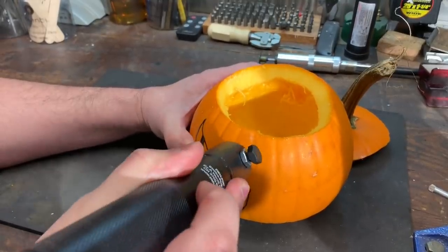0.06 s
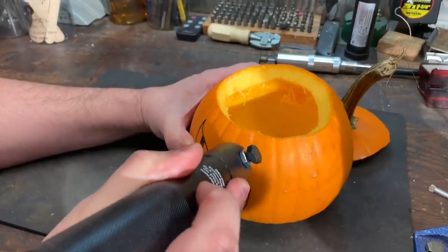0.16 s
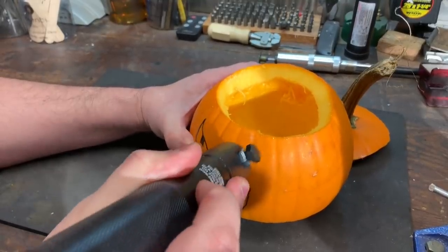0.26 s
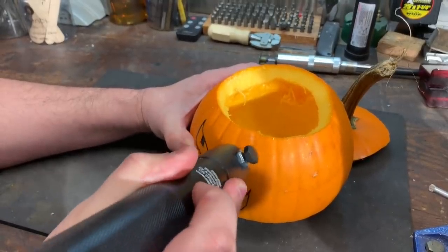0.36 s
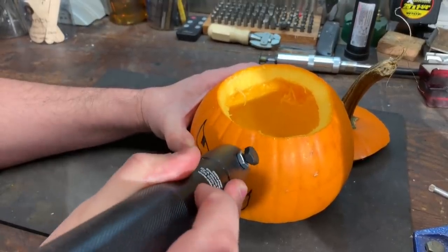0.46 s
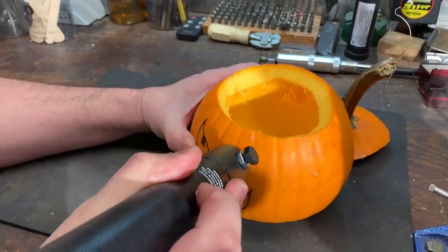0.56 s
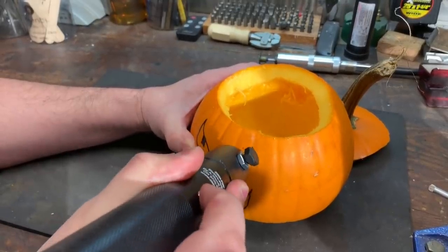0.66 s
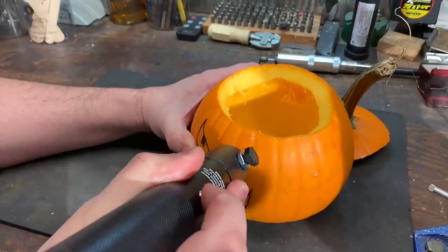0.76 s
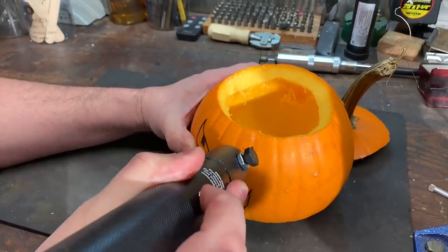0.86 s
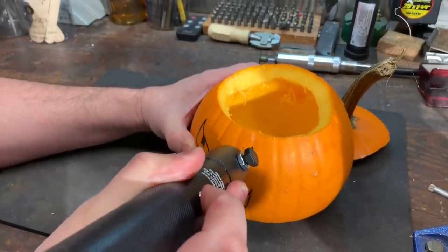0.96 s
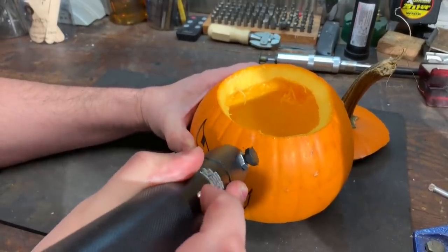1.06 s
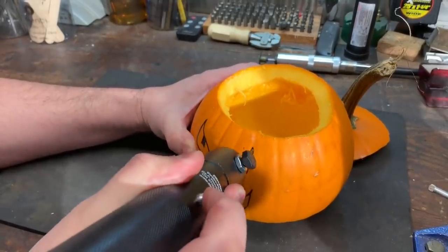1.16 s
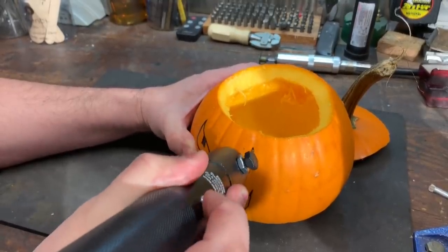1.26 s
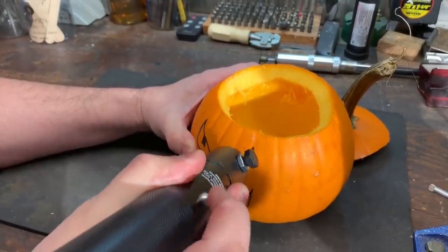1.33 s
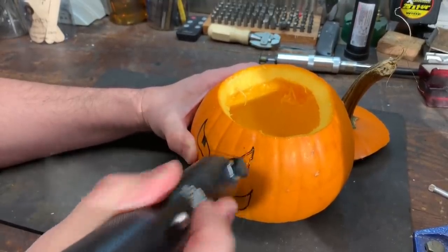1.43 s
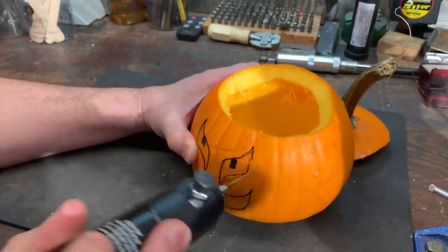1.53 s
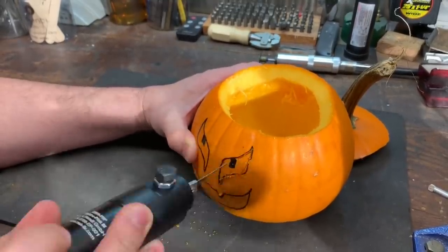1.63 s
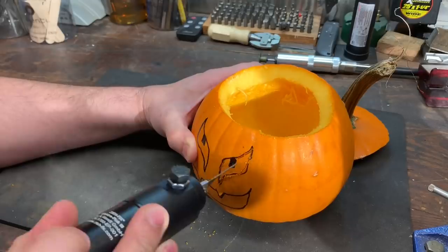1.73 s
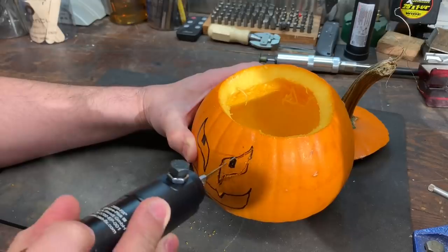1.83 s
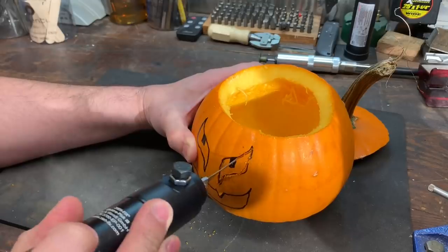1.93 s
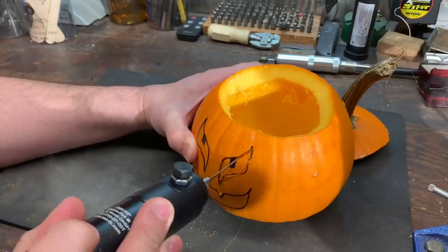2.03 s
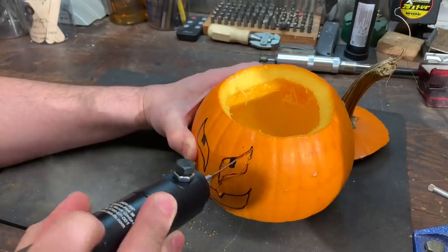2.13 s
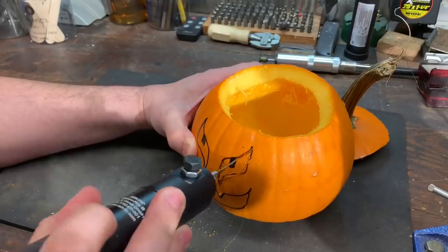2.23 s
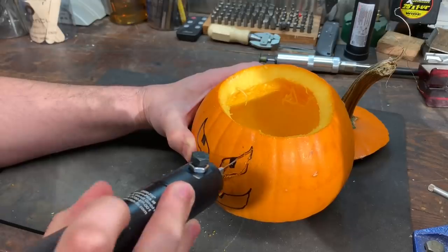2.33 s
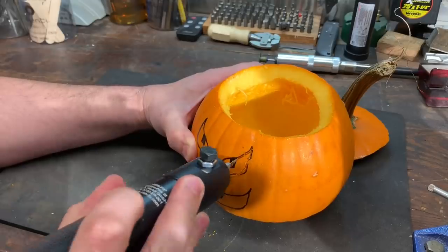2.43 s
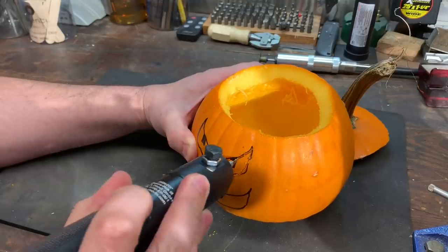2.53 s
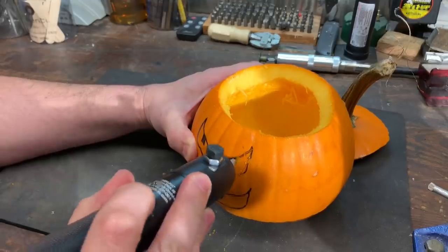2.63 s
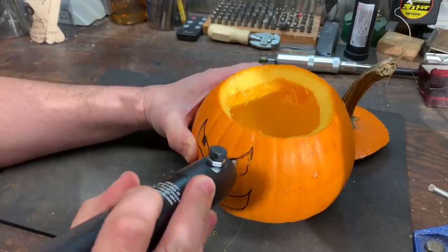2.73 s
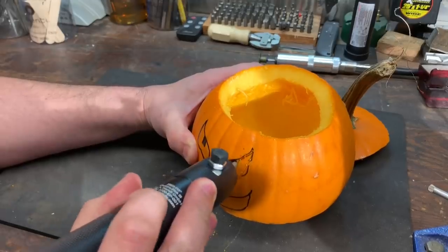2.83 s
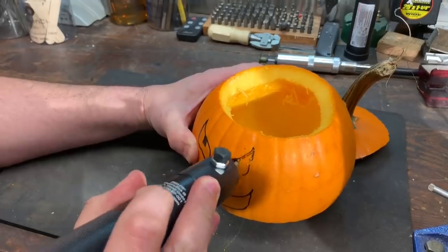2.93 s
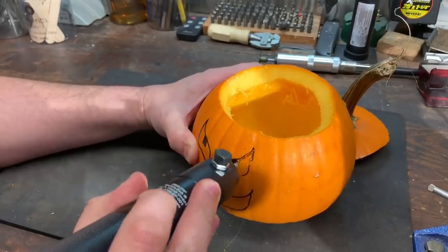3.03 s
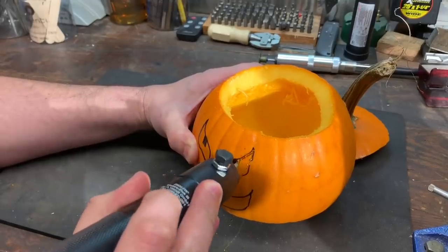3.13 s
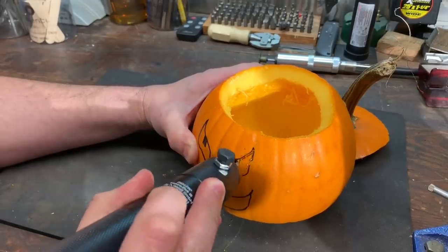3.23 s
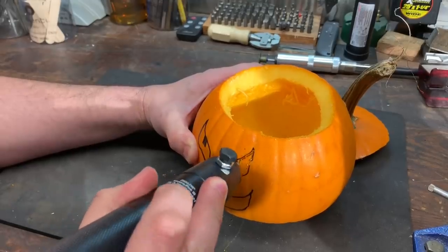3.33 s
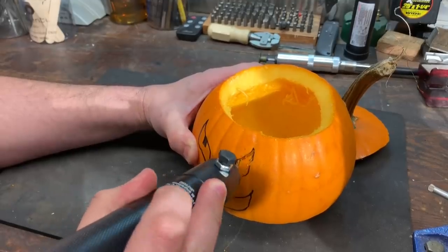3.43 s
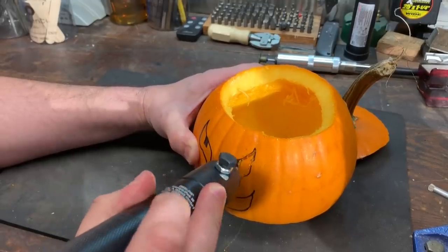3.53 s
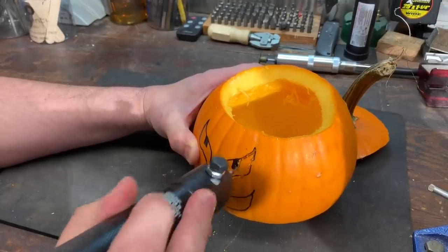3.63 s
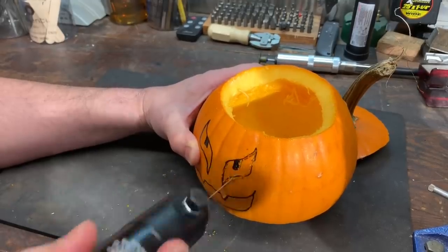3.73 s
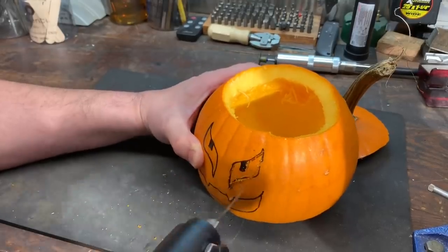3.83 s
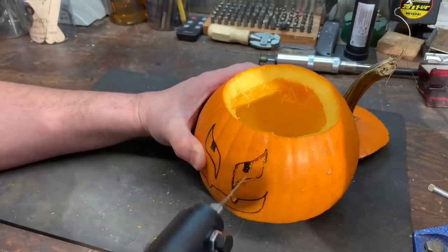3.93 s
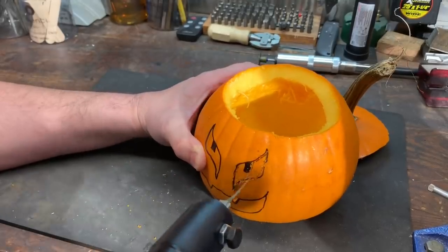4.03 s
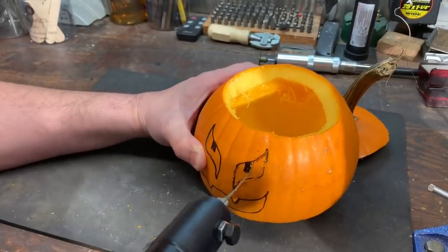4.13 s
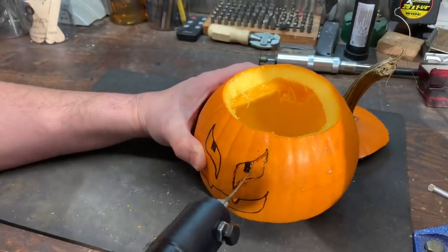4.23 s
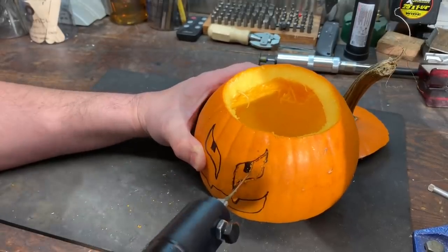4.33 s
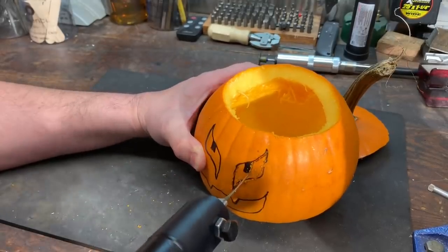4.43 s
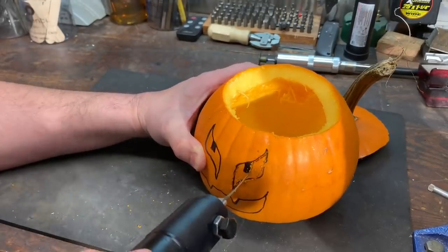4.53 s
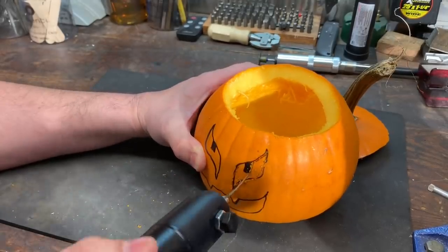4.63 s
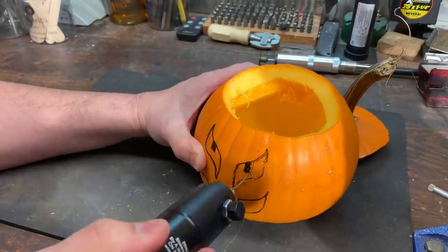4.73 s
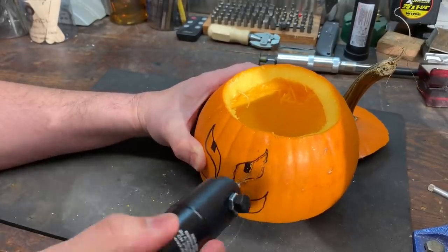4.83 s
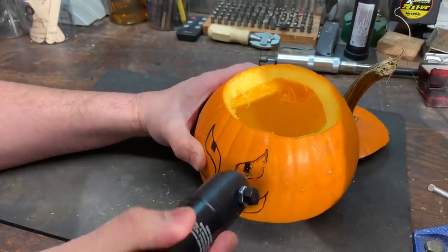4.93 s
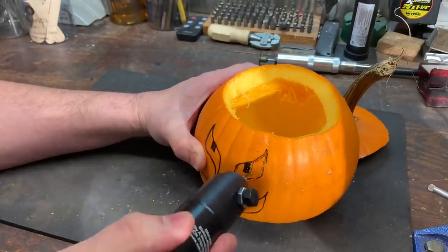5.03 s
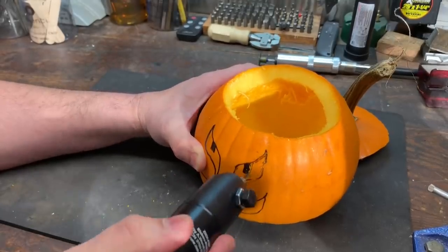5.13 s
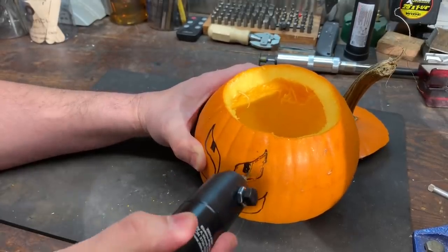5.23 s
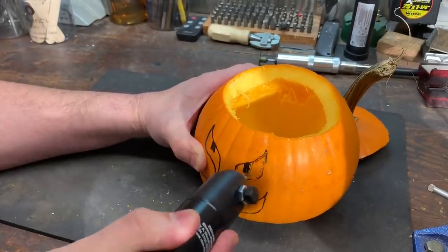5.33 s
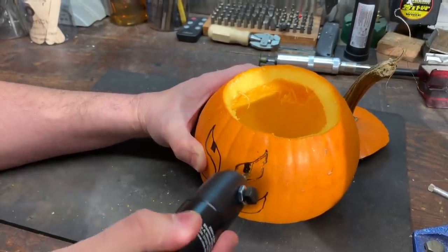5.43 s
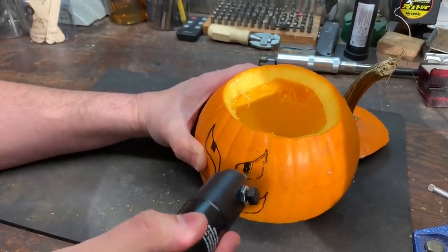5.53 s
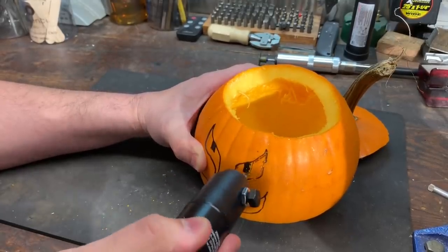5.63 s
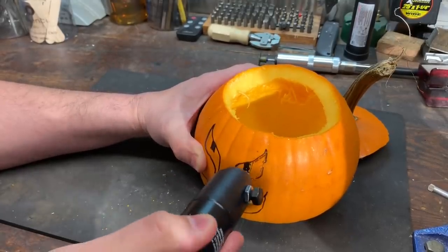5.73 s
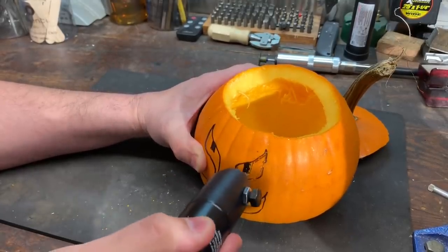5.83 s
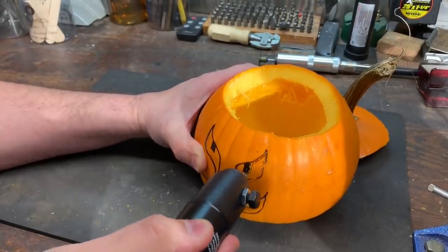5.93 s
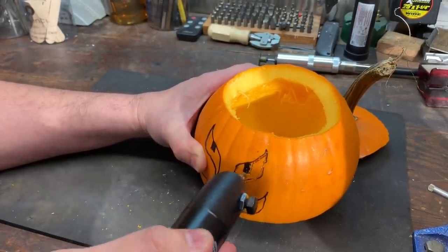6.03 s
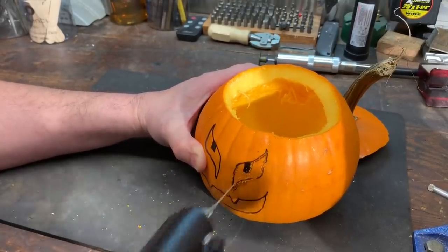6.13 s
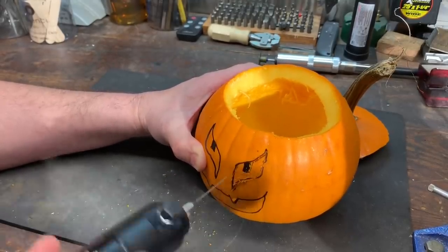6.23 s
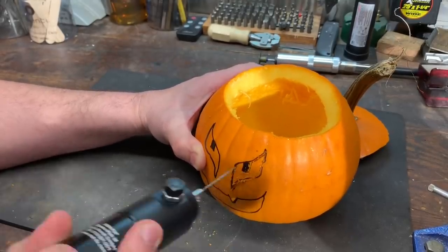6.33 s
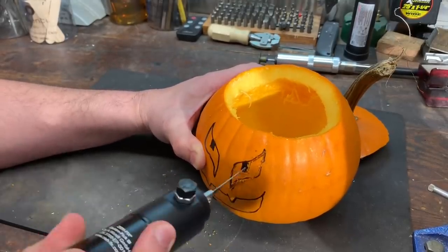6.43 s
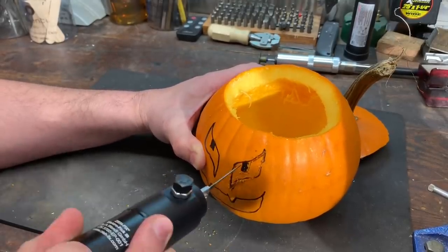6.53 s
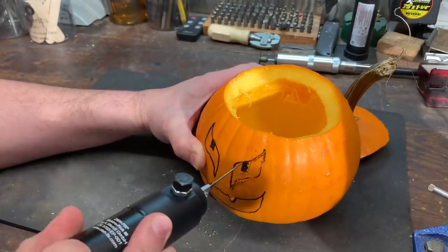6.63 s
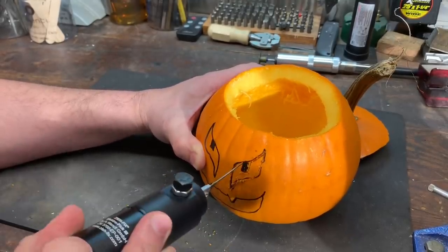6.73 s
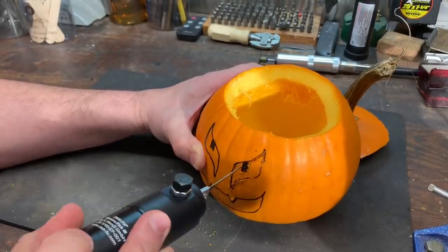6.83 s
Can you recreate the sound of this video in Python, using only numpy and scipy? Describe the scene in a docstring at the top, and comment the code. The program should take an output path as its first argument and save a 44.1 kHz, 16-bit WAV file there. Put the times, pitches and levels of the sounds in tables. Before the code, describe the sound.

Close, raspy motor-driven hammering on a hollow pumpkin comes in four bursts, its pitch wavering, with faint rustles and ticks in the quiet gaps.

```python
"""An electric pick gun buzzes in four bursts against a pumpkin: each blow of its striker excites resonances.
Loose bouncing gives a ragged rattle; when the needle bites into the flesh the striker locks into a
steadier beat, mostly 340-410 blows a second, which adds a harmonic series.
Behind it in a quiet workshop: air noise, mains buzz as harmonics of 120 Hz and a wavering low tone;
fingers slide as clumped grains, ticks are dying noise puffs, crickets trill as narrow-band noise."""
import sys
import numpy as np
from scipy import signal
from scipy.fft import rfft, irfft
from scipy.io import wavfile
from scipy.ndimage import uniform_filter1d

SR = 44100
rng = np.random.default_rng(int(sys.argv[2]) if len(sys.argv) > 2 else 0)


def generate_wav(signal):
    """Clip the signal to [-1, 1] and save it as 16-bit WAV at the path in sys.argv[1]."""
    frames = np.transpose(np.atleast_2d(signal))
    scaled = np.clip(frames, -1, 1) * 32767
    pcm = np.round(scaled).astype(np.int16)
    wavfile.write(sys.argv[1], SR, pcm)


N = 302967
T = np.arange(N) / SR


def amp(db):
    """Decibel law: the amplitude ratio of a level in dB."""
    return 10 ** (np.asarray(db) / 20)


def rms_one(x):
    """Power normalization: the signal scaled to unit mean square."""
    return x / np.sqrt(np.mean(x ** 2) + 1e-20)


def in_time(rows):
    """Linear interpolation: each column after the first as a curve over all samples."""
    s, *columns = np.transpose(rows)
    return [np.interp(T, s, column) for column in columns]


def faded(start, end, in_s, out_s):
    """Linear envelope: 1 between start and end, with straight ramps inside."""
    return np.clip(np.minimum((T - start) / in_s, (end - T) / out_s), 0, 1)


def drift(hz):
    """Low-passed random process: two equal poles at hz leave slow chance of unit rms."""
    r = np.exp(-2 * np.pi * hz / SR)
    noise = rng.standard_normal(N + SR)
    settled = signal.lfilter([1], [1, -2 * r, r * r], noise)[SR:]
    return rms_one(settled)


def resonate(x, hz, width_hz):
    """Damped resonator: a pole pair whose bandwidth sets its decay, with gain near 1 at the peak."""
    r = np.exp(-np.pi * width_hz / SR)
    zeros = np.array([1, 0, -1]) * (1 - r * r) / 2
    poles = [1, -2 * r * np.cos(2 * np.pi * hz / SR), r * r]
    return signal.lfilter(zeros, poles, x + 1e-18)


def body(x, modes, damping=1):
    """Modal superposition: parallel resonators of alternating sign; damping widens each one."""
    return sum((-1) ** k * amp(db) * resonate(x, hz, width * damping)
               for k, (hz, width, db) in enumerate(modes))


def evened(x, window_s):
    """Level equalization: division by the smoothed rms removes slow level changes."""
    size = int(window_s * SR)
    power = uniform_filter1d(uniform_filter1d(x * x, size), size)
    return x / np.sqrt(power + 1e-14)


def echoes(x, t60, first_s):
    """Diffuse reverberation: convolution with exponentially decaying noise of unit energy."""
    t = T[:SR // 2]
    pattern = rng.standard_normal(len(t)) * amp(-60 * t / t60) * (t > first_s)
    return signal.fftconvolve(x, pattern / np.sqrt(np.sum(pattern ** 2)))[:N]


# The needle bites: locked_from_s, locked_to_s, locking_s, slipping_s, looseness_left (0-1),
# then level shifts housing_and_cap_db, needle_db, collet_db, tip_db
BITES = [(0.514, 0.609, 0.029, 0.052, .45, -0.5, -3.5, 1, 0),
         (.65, 0.896, 0.042, 0.037, 0.02, -0.5, 3, 11.5, 5),
         (2.62, 2.673, 0.038, 0.022, .05, -1.5, 1, -1, 4),
         (2.926, 3.314, 0.044, 0.047, 0.09, -1.5, 1, -1.5, 1.5),
         (3.491, 3.51, .02, .025, .16, -3.5, 4.5, -7.5, 3),
         (5.125, 5.168, 0.041, 0.011, 0, -1.5, 0, 7.5, -9),
         (5.373, 5.906, .04, 0.045, 0.07, -1, 4.5, 11.5, 4)]
FREE_LOOSENESS = 0.96


def grip_of_flesh():
    """Mechanical constraint: held flesh lowers the striker's looseness and shifts the treble balance."""
    loose, shift_db = np.full(N, FREE_LOOSENESS), 0
    for start, end, lock, slip, left, *db in BITES:
        held = faded(start - lock, end + slip, lock, slip)
        loose = np.minimum(loose, 1 - held * (1 - np.clip(left, .005, 1)))
        shift_db = shift_db + np.outer(db, held)
    return loose, shift_db


# Trigger pulls, each grip shifting the treble balance: press_s, let_go_s, last_blow_s,
# then levels against the treble housing_db, cap_db, needle_db, collet_db, tip_db
PULLS = [(-.1, 0.999, 1.006, -3.5, -3, -11, -20.5, -13), (1.146, 1.261, 1.323, -2.5, -3, -9, -13, -12),
         (2.518, 3.535, 3.7, -3.5, -11, -4, -15, -10), (4.994, 5.946, 5.974, -3, -16.5, -7, -10.5, -9.5)]
KICK_DB, START_SPEED, SPIN_UP_S = -17.5, .3, .024   # level and share of full speed at the press
RUN_DOWN_DB_PER_S, COAST_S = 378, .05   # level fall and time constant of the slowing after release
STALL_DB = -5   # further drop when the blows cease


def trigger():
    """Motor inertia: level and speed ramp up at the press and run down exponentially after release."""
    pulls = np.array(PULLS)
    pull = np.clip(np.searchsorted(pulls[:, 0], T) - 1, 0, None)
    press, let_go, last_blow, *balance_db = pulls[pull].T
    slow = np.clip(1 - (T - press) / SPIN_UP_S, 0, 1)
    after = np.maximum(T - let_go, 0)
    stalled = T > last_blow
    speed = (1 - (1 - START_SPEED) * slow) * np.where(stalled, .001, np.exp(-after / COAST_S))
    stall_db = STALL_DB * uniform_filter1d(1. * stalled, size=400)
    gain = amp(KICK_DB * slow - RUN_DOWN_DB_PER_S * after + stall_db)
    grip = np.maximum(pull - 1, 0)   # the first two pulls share a grip
    return gain, speed, grip, balance_db


def clicks(s, size):
    """Band-limited impulses: windowed sinc pulses at times that may fall between samples."""
    at = s[:, None] * SR
    taps = np.floor(at) + np.arange(-8, 9)
    shape = np.sinc(taps - at) * np.cos(np.pi * (taps - at) / 20) ** 2
    places = np.clip(taps, 0, N).astype(int).ravel()
    return np.bincount(places, (size[:, None] * shape).ravel(), N + 1)[:N]


LOOSE_BLOWS_PER_S = 290   # at full speed, before the wobble
# spreads at looseness 1: timing in cycles, level of each blow, slow surge, and a blow's share to each part
LOOSE_SCATTER_CYCLES, LOOSE_SPREAD_DB, SURGE_DB, PART_SPREAD_DB = 0.31, 4, 0.5, 1.5
WOBBLE = .004   # rms share of the blow rate


def blows(loose, locked_rate, speed):
    """Jittered impulse train: one blow a cycle for each part, more scattered and uneven when looser."""
    free = np.clip(2 * loose - 1, 0, 1)
    full_rate = locked_rate + free * (LOOSE_BLOWS_PER_S - locked_rate)
    rate = full_rate * speed * (1 + WOBBLE * drift(30))
    cycles = np.cumsum(rate) / SR
    due = np.arange(3000)   # more blows than the scene needs
    chance = rng.standard_normal((3000, 9))   # columns: timing, level, seven parts
    slack = np.interp(due, cycles, loose)
    s = np.interp(due + LOOSE_SCATTER_CYCLES * slack ** 2 * chance[:, 0], cycles, T)
    surge = np.interp(s, T, drift(17))
    size_db = slack * (LOOSE_SPREAD_DB * chance[:, 1] + SURGE_DB * surge)
    size = amp(size_db) * (due < cycles[-1] - 2)
    # a loose blow lands askew and favours some parts
    hits = [clicks(s, size * amp(slack * PART_SPREAD_DB * own)) for own in chance.T[2:]]
    return hits, cycles


BENCH_T60_S, BENCH_DB = 0.028, -5   # level at looseness 0.5
LOCKED_ECHO_DB = 5.5   # change of echo level per unit of looseness lost


def bench(x, loose):
    """Early reflections: two patterns off bench and pumpkin rotate into each other as the gun moves."""
    turn = 2.1 * drift(3.2)
    later, sooner = echoes(x, BENCH_T60_S, 0.003), echoes(x, BENCH_T60_S, 0.0011)
    near = np.cos(turn) * later + np.sin(turn) * sooner
    return x + amp(BENCH_DB + LOCKED_ECHO_DB * (0.5 - loose)) * near


# How gun and pumpkin pass a harmonic of the locked beat; one list each for the grip of
# the first two pulls, the third, the fourth: pitch_hz, level_db
SONG = [
    [(400, -40.5), (800, -27), (1200, -27), (1600, -30), (2000, -33), (2400, -39), (2800, -46),
     (3200, -51.0), (3600, -46)],
    [(340, -33.5), (390, -41), (680, -49), (730, -31), (790, -33.0), (1030, -31.5), (1100, -32),
     (1180, -23.0), (1370, -38.5), (1460, -29), (1560, -20.5), (1710, -36.5), (1830, -37.5), (1960, -27),
     (2100, -42.5), (2400, -39), (2550, -55.5), (2750, -48), (3080, -41), (3300, -44.5), (3550, -54.5)],
    [(340, -44), (390, -43), (680, -39.5), (730, -40), (790, -26.5), (1030, -33.5), (1100, -39),
     (1180, -27), (1370, -52), (1460, -46.5), (1560, -24), (1710, -46), (1830, -44), (1960, -39),
     (2100, -44), (2400, -45), (2550, -46.5), (2750, -45.0), (3080, -40), (3300, -51.5), (3550, -45)],
]
FLUTTER_DB, FRAY_DB = 0.5, 1   # rms of harmonic 1, fray at looseness 1; both grow as root of the number
FRAY_RADIANS = .5   # rms phase of harmonic 1 at looseness 1; grows with the number
OVERTONE_LEAD = 0.39   # radians of lead, times the square of the harmonic number less one


def locked_song(loose, locked_rate, bright_db, grip, cycles):
    """Fourier series: nine harmonics of the beat flutter slowly, and fray fast with looseness."""
    fray = FRAY_RADIANS * loose * drift(150)
    song = 0
    for k in range(1, 10):
        path_db = np.choose(grip, [np.interp(k * locked_rate, *np.transpose(path)) for path in SONG])
        tilt_db = bright_db * np.log2(k / 3)   # pivots on harmonic 3
        flutter_db = FLUTTER_DB * np.sqrt(k) * drift(25)
        fray_db = FRAY_DB * np.sqrt(k * loose) * drift(120)
        phase = 2 * np.pi * k * cycles + OVERTONE_LEAD * (k - 1) ** 2 + k * fray
        song = song + amp(path_db + tilt_db + flutter_db + fray_db) * np.sin(phase)
    return song


# Resonances of the seven parts and the low shake of the whole gun, widths before any bite damping,
# levels relative within a part: pitch_hz, width_hz, level_db
PUMPKIN = [(432, 400, -26), (536, 88, -5.5), (608, 48, 2.5), (829, 71, 0), (969, 150, 2), (1254, 39, 1.5)]
BARREL = [(1519, 76, -0.5), (1980, 160, 0), (2030, 85, 3.5), (2237, 129, -5.5), (3020, 150, -14)]
HOUSING = [(3810, 840, -14.5), (4500, 180, -9), (5910, 490, -5.5)]
CAP = [(6400, 870, -1), (7020, 300, -2), (7450, 240, -20.5)]
NEEDLE = [(7970, 3200, -20.5), (8790, 2500, -14), (10060, 640, -15.5), (10900, 270, -27.5)]
COLLET = [(11440, 450, -2), (12440, 340, 2), (13800, 560, -9.5)]
TIP = [(13400, 550, -26.5), (14600, 690, -23.5), (15646, 1200, -27.5)]
SHAKE = [(105, 110, -3), (130, 150, -8.5), (239.6, 33, -1.5)]
# Flesh round the needle widens the resonances, one per part in the order above: width_factor
BITE_DAMPING = [1.6, 3.2, 1.8, 2.7, 1.9, 8.1, 5.4]
# Scraping after each blow, one per part, before scaling by looseness: level_db
RASP_DB = [-35.5, -24, -5, -7.5, -6, -6, -3]
# Steady grinding of the cam, one per part, before scaling by looseness: level_db
GRIND_DB = [-40, -25.5, -22, -24, -16.5, -23, -26]
LOCKED_RASP, LOCKED_GRIND = 0.035, 0.71   # scale left at looseness 0
# Force of the blows while the trigger is held, one list a pull: time_s, pumpkin_db, barrel_db, treble_db
FORCE = [
    [(0.0, -22, -18.5, -19.5), (0.008, -26, -22.5, -28.5), (0.198, -27, -22.5, -28),
     (0.24, -31, -34.5, -30.5), (0.278, -28.5, -22, -28), (0.34, -32.5, -32, -33),
     (0.376, -23, -23.5, -27.5), (0.472, -29, -25.5, -29), (0.542, -20.5, -20.5, -28),
     (0.558, -26.5, -36, -38), (0.578, -20, -20, -24.5), (0.632, -26, -26, -33.5),
     (0.656, -23, -24.5, -34.5), (0.888, -24.5, -26.5, -34), (0.908, -25, -19, -25),
     (0.936, -29.5, -32, -35), (0.97, -25, -24, -26.5), (1.005, -25, -28.5, -31.5)],
    [(1.177, -33.5, -33.5, -34.5), (1.201, -30.5, -28.5, -29), (1.221, -26.5, -23.5, -28.5),
     (1.241, -26.5, -26.5, -37.5), (1.26, -32, -33.5, -35)],
    [(2.543, -26.5, -32, -31.5), (2.559, -27.5, -26, -29.5), (2.617, -17.5, -21.5, -33),
     (2.709, -24, -24, -27), (2.715, -28.5, -24.5, -29), (2.883, -28.5, -29, -35),
     (2.917, -31.5, -27, -29.5), (2.969, -27, -21.5, -33.5), (3.081, -25.5, -34, -34),
     (3.147, -30, -45, -30.5), (3.201, -31, -33, -35), (3.321, -26, -27, -33.5), (3.335, -25.5, -22, -26.5),
     (3.407, -31, -31.5, -37.5), (3.411, -29, -29, -33.5), (3.461, -29, -34, -38), (3.499, -19, -24, -33),
     (3.545, -33, -30.5, -34)],
    [(5.019, -25.5, -30, -30.5), (5.091, -24.5, -29, -29.5), (5.109, -22, -36, -36),
     (5.123, -23.5, -46, -32.5), (5.159, -19, -44, -34.5), (5.167, -22, -32.5, -29),
     (5.281, -32.5, -26.5, -30.5), (5.415, -26, -42.5, -37), (5.459, -25.5, -17.5, -34.5),
     (5.573, -22.5, -29, -35.5), (5.631, -16.5, -28, -36.5), (5.663, -15.5, -22, -40),
     (5.751, -35, -24, -34.5), (5.779, -45, -16, -34), (5.871, -24, -28, -36.5), (5.905, -19, -29, -39),
     (5.945, -36.5, -37.5, -42.5)],
]
# Low shake of the whole gun, one list a pull: time_s, level_db
SHAKING = [
    [(0.0, -51), (0.026, -40.5), (0.496, -38.5), (0.57, -55.5), (0.618, -45.5), (0.698, -72), (0.878, -70),
     (0.922, -39), (1.005, -37.5)],
    [(1.177, -37), (1.26, -46.5)],
    [(2.543, -33), (2.667, -56), (2.715, -32.5), (2.875, -32.5), (2.975, -59.5), (3.301, -70.5),
     (3.345, -30), (3.441, -30), (3.545, -52)],
    [(5.019, -40.5), (5.105, -48), (5.149, -62.5), (5.243, -42), (5.333, -40), (5.405, -63.5),
     (5.841, -75.5), (5.889, -74), (5.945, -45)],
]
# Locked beat, one list a bite: time_s, rate_blows_per_s, pressure_db, brightness_db_per_octave
BEAT = [
    [(.5, 299, 3, -1), (.54, 293, -1, 2), (.568, 385, 0, -0.5), (.615, 298, 3.5, -1.5)],
    [(0.625, 344, 2.5, 1), (0.639, 390, 0.5, 2), (0.651, 407, 1, -1.5), (0.663, 411, 3, 0.5),
     (0.895, 393, 0, -0.5), (0.913, 309, -1.5, -1.5), (0.93, 311, 2, 0.0)],
    [(2.6, 352.6, 1, 2), (2.616, 389.1, 0.5, 0.0), (2.674, 389.7, 0, -1), (2.69, 342.5, 1, 0.5)],
    [(2.895, 340, 1.5, -1), (2.907, 361, -1, 1.5), (2.931, 371, -1.5, 1), (2.995, 366, 1.5, -1),
     (3.035, 361, 0.5, -1), (3.075, 345, 0.0, 1.5), (3.175, 347, 1.5, 1.5), (3.203, 338, -1, 0.5),
     (3.301, 342, -1.5, 1), (3.337, 311, -4, -0.5), (3.35, 312, 0.5, 2.5)],
    [(3.485, 398, -0.5, -1), (3.505, 405, 0.5, 0.0), (3.525, 317, -1, 6)],
    [(5.108, 368.4, -2, -1.5), (5.13, 398.8, -2, -0.5), (5.17, 410.3, 5, 2)],
    [(5.355, 338, 2, 2), (5.375, 363, -1, 0.5), (5.409, 358, 2, 1), (5.471, 385, 1.5, 0.0),
     (5.565, 343, 0.5, 2), (5.619, 340, -2, 2), (5.675, 386, 1.5, -2.5), (5.749, 365, 4, 0.0),
     (5.797, 395, -5.5, -2), (5.843, 366, 4, 1.5), (5.873, 362, 1, -1), (5.903, 397, 0.5, 0.5),
     (5.909, 391, 2.5, -2.5), (5.923, 303, 1.5, 0.5), (5.93, 303, -1, 1)],
]
COLLET_DB_PER_HZ, COLLET_BEAT_HZ = -0.1268, 365   # the collet rings more under a slow locked beat


def pick_gun():
    """Forced vibration: blows ring seven parts and shake the gun; a locked beat sings as harmonics."""
    loose, shift_db = grip_of_flesh()
    running, speed, grip, balance_db = trigger()
    shake_db, = in_time(np.vstack(SHAKING))
    pumpkin_db, barrel_db, treble_db = in_time(np.vstack(FORCE))
    locked_rate, pressure_db, bright_db = in_time(np.vstack(BEAT))
    parts_db = np.array([pumpkin_db, barrel_db, *(treble_db + np.array(balance_db))])
    parts_db[2:] += shift_db[[0, 0, 1, 2, 3]]   # housing and cap share a shift
    parts_db[5] += COLLET_DB_PER_HZ * (locked_rate - COLLET_BEAT_HZ) * (1 - loose)

    hits, cycles = blows(loose, locked_rate, speed)
    grind = rng.standard_normal(N)
    above_78_hz = signal.butter(5, 78, "high", fs=SR, output="sos")
    shake = signal.sosfilt(above_78_hz, grind * 0.012 + hits[0] * loose)
    out = amp(shake_db) * evened(body(shake, SHAKE), 0.017)

    ragged = loose ** 0.54   # in pumpkin and barrel the ragged ringing gives way to the harmonics
    for k, modes in enumerate([PUMPKIN, BARREL, HOUSING, CAP, NEEDLE, COLLET, TIP]):
        wake = signal.lfilter([1], [1, -.97], np.abs(hits[k]))   # time constant under a millisecond
        rasp = amp(RASP_DB[k]) * rng.standard_normal(N) * wake * (LOCKED_RASP + loose ** 2)
        push = hits[k] + rasp + amp(GRIND_DB[k]) * grind * (LOCKED_GRIND + loose)
        free_ring = body(push * np.sqrt(loose), modes)
        damped_ring = body(push * np.sqrt(1 - loose), modes, BITE_DAMPING[k])
        ring = evened(bench(free_ring + damped_ring, loose), 0.026)
        out += amp(parts_db[k]) * (ragged if k < 2 else 1) * ring

    song = locked_song(loose, locked_rate, bright_db, grip, cycles)
    biting = np.clip(1.5 - 2 * loose, 0, 1)
    return running * (out + np.sqrt(2) * biting * amp(pressure_db) * song)


SHOP_T60_S, SHOP_DB, WALL_CUT_HZ = 0.89, -33.5, 870


def workshop(x):
    """Room reverberation: a diffuse tail, its treble cut as by absorbing walls."""
    dull = signal.butter(1, WALL_CUT_HZ, fs=SR, output="sos")
    return amp(SHOP_DB) * signal.sosfilt(dull, echoes(x, SHOP_T60_S, 0.0045))


# Spectrum of the still air, relative before scaling to AIR_DB: frequency_hz, density_db
AIR = [(15, -21), (25, -5), (55, -9.5), (80, -12), (130, -8), (175, -22.5), (300, -24.5), (600, -30),
       (1200, -35.5), (2800, -44), (4000, -45), (8000, -46.5), (16000, -51.5)]
AIR_DB = -64   # rms


def still_air():
    """Spectral shaping: white noise weighted by frequency is the steady noise of room and microphone."""
    hz = np.maximum(np.fft.rfftfreq(N, 1 / SR), 1)
    air_hz, air_db = np.transpose(AIR)
    colour = amp(np.interp(np.log(hz), np.log(air_hz), air_db))
    return amp(AIR_DB) * rms_one(irfft(rfft(rng.standard_normal(N)) * colour, N))


# Mains lines at multiples 1 to 24 of MAINS_HZ: level_db (rms)
MAINS_DB = [-93.5, -85, -92.5, -85.5, -86, -91.5, -94, -85.5, -97.5, -89.5, -92.5, -89, -94, -92, -97.5,
            -93, -99, -91, -99, -99, -99, -88, -99, -98]
MAINS_HZ = 120


def mains_buzz():
    """Harmonic series: steady thin lines at multiples of one frequency, with random phases."""
    phases = rng.uniform(0, 2 * np.pi, len(MAINS_DB))
    lines = sum(amp(db) * np.sin(2 * np.pi * (k + 1) * MAINS_HZ * T + phases[k])
                for k, db in enumerate(MAINS_DB))
    return np.sqrt(2) * lines


# Fingers sliding on gun and rind: start_s, end_s, level_db
RUSTLE = [(1.393, 1.596, -73), (1.93, 2.46, -74.5), (3.62, 3.88, -85), (4.53, 4.864, -67),
          (6.026, 6.325, -72)]
# Resonances of the hand-held parts, relative levels: pitch_hz, width_hz, level_db
RUSTLE_RING = [(684, 350, -2.5), (1110, 290, 3), (1490, 370, 4), (1700, 290, 3.5), (2490, 920, -10.5),
               (6398, 10200, -19), (12095, 3600, -19.5)]
RUSTLE_FADE_S = 0.055


def rustle():
    """Friction noise: fine clumped grains ring the hand-held parts."""
    sliding = sum(amp(db) * faded(start, end, RUSTLE_FADE_S, RUSTLE_FADE_S) for start, end, db in RUSTLE)
    grains = rng.standard_normal(N) * amp(2.0 * drift(80) + 0.5 * drift(12))
    return sliding * rms_one(body(grains, RUSTLE_RING))


# Swells of the low hum, levels before the wavering: start_s, end_s, pitch_hz, level_db (rms)
HUM = [(1.4, 2.45, 128.6, -87), (3.535, 4.288, 139.1, -62), (4.38, 5.0, 138, -76.5),
       (5.104, 5.905, 138, -60.5), (6.109, 7.1, 136, -60)]
HUM_FADE_S = 0.11


def low_hum():
    """Amplitude modulation: a low sine swells and fades while its level wavers at random."""
    low = sum(amp(db) * faded(start, end, HUM_FADE_S, HUM_FADE_S) * np.sin(2 * np.pi * hz * T)
              for start, end, hz, db in HUM)
    return np.sqrt(2) * amp(1.5 * drift(10.0)) * low


# Ticks of gun and bench: start_s, peak_db, pitch_hz, edge_db (before scaling to the peak)
TICKS = [(1.402, -54, 1530, -16.5), (1.549, -62, 1004, -15), (1.921, -59, 1194, -23),
         (2.106, -58.5, 1540, -20), (2.149, -67, 1480, -15), (2.381, -60, 1350, -23),
         (3.809, -65, 1680, -16), (3.994, -56, 1080, -26), (4.887, -58, 1640, -14), (6.062, -53, 1390, -7),
         (6.489, -65, 1034, -19)]
TICK_T60_S = 0.034


def ticks():
    """Impulsive excitation: dying noise puffs ring at their own pitch, with an edge near 5 kHz."""
    out = np.zeros(N)
    for s, db, hz, edge_db in TICKS:
        decay = (T >= s) * amp(-60 * np.maximum(T - s, 0) / TICK_T60_S)
        puff = rng.standard_normal(N) * decay
        ring = resonate(puff, hz, 0.28 * hz) + amp(edge_db) * resonate(puff, 5000, 2600)
        out += amp(db) * ring / np.abs(ring).max()
    return out


# Cricket trills, width of each of two resonances in series: start_s, end_s, pitch_hz, width_hz, level_db
TRILLS = [(1.83, 2.187, 7050, 150.4, -83.5), (1.899, 2.233, 7560, 120, -90), (4.142, 4.47, 7040, 152, -84),
          (4.15, 4.47, 6740, 200, -89), (1.85, 2.18, 6600, 200, -91), (6.146, 6.402, 7640, 200, -87),
          (6.469, 6.783, 6990, 151, -83.5), (6.475, 6.755, 6560, 119.8, -93)]
TRILL_FADE_S = 0.027


def crickets():
    """Narrow-band noise: two equal resonances in series leave a faint trill, faded in and out."""
    out = np.zeros(N)
    for start, end, hz, width, db in TRILLS:
        trill = resonate(resonate(rng.standard_normal(N), hz, width), hz, width)
        out += amp(db) * faded(start, end, TRILL_FADE_S, TRILL_FADE_S) * rms_one(trill)
    return out


def scene():
    """Linear superposition: all sources add in the middle, alike in both channels."""
    gun = pick_gun()
    background = still_air() + mains_buzz() + low_hum() + crickets()
    mid = gun + workshop(gun) + background + rustle() + ticks()
    return np.array([mid, mid])


CUTOFF_HZ = 16100


def record(dry):
    """Band limitation: a steep low-pass filter removes the top."""
    return signal.sosfilt(signal.cheby2(24, 60, CUTOFF_HZ, fs=SR, output="sos"), dry)


dry = scene()
out = record(dry)
generate_wav(out)
```